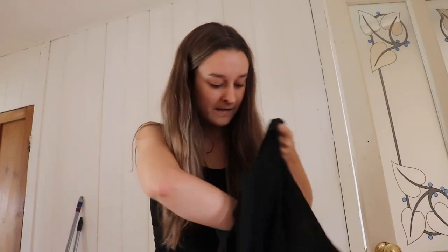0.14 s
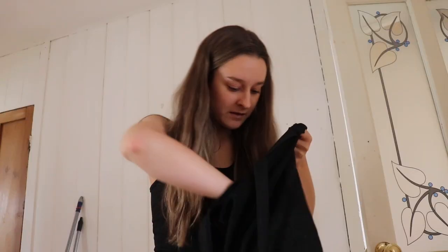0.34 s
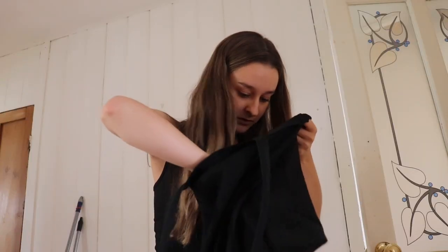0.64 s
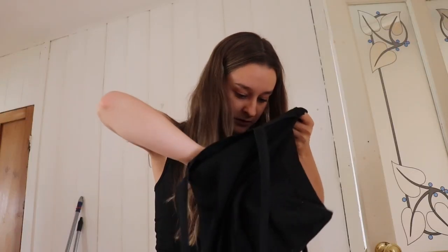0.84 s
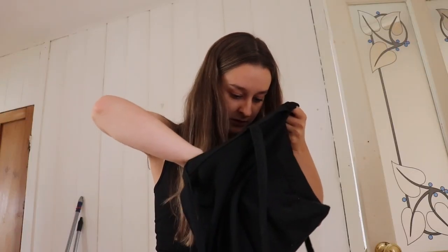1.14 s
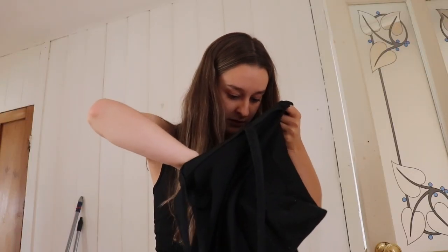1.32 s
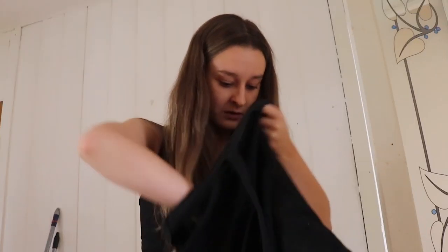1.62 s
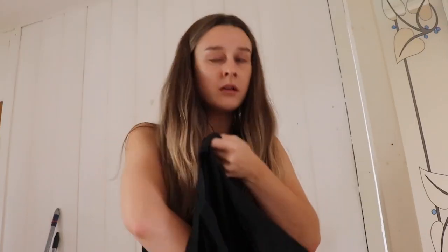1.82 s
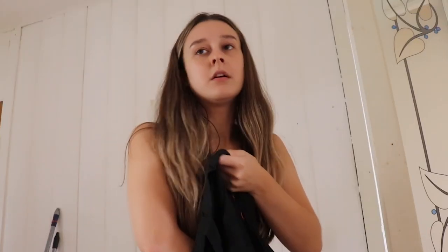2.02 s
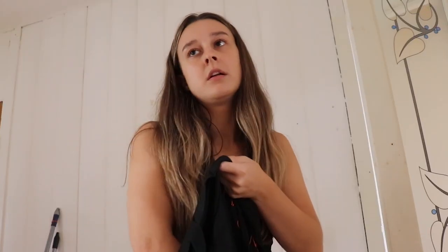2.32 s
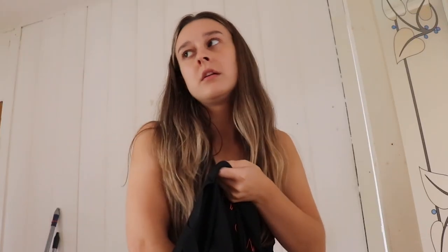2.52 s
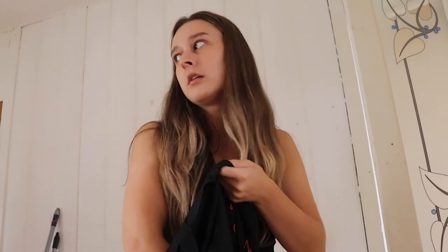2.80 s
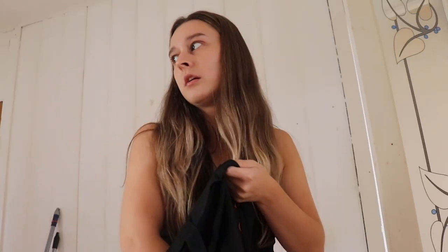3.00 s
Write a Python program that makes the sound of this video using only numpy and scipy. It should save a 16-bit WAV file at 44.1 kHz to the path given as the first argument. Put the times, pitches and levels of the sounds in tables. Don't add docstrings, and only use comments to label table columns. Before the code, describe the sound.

A hand rummages through a cloth bag, small hard items knocking, with a short pause midway

```python
import sys
import numpy as np
from scipy import signal
from scipy.fft import rfft, irfft, next_fast_len
from scipy.io import wavfile
from scipy.ndimage import uniform_filter1d

SR = 44100
rng = np.random.default_rng(int(sys.argv[2]) if len(sys.argv) > 2 else 0)


def volts_from_decibels(level):
    exponent = np.asarray(level, float) / 20
    return 10 ** exponent


def to_wav(sig):
    pcm = np.clip(np.atleast_2d(sig), -1, 1) * 32767
    pcm = np.round(pcm).astype(np.int16)
    wavfile.write(sys.argv[1], SR, pcm.T)


N = 138915

# start in seconds, length in seconds, effort in dB,
# brightness in dB per octave, share of the stroke spent rising.
STROKES = [(0, 0.2, -42, 1, 0.033), (0.059, 0.28, -30, 2, 0.21), (0.126, 0.21, -24, 0.5, 0.46),
           (0.255, 0.27, -28.5, 1.5, 0.37), (0.414, 0.029, -32, 8.5, 0.044),
           (0.441, 0.12, -30.5, 1.5, 0.098), (0.532, 0.3, -42, 4, 0.15), (0.798, 0.078, -51.5, 7, 0.63),
           (0.9, 0.057, -55.5, 4, .1), (0.892, 0.13, -56, -1.5, 0.51), (1.559, 0.1, -45.5, 3.5, 0.21),
           (1.602, 0.066, -38, 2.5, .1), (1.654, 0.17, -34, 2.5, 0.028), (1.748, 0.18, -47, 2.5, 0.36),
           (1.855, 0.084, -40, 1.5, 0.33), (1.9, 0.2, -34, 0, 0.036), (1.965, 0.36, -32, 1, 0.31),
           (2.155, 0.21, -30.5, 0, 0.79), (2.31, 0.23, -32.5, 2, 0.23), (2.473, 0.24, -27.5, 0.5, 0.043),
           (2.594, 0.087, -28.5, 0.5, 0.41), (2.711, 0.17, -37.5, 2, 0.26), (2.823, 0.094, -30.5, -1, 0.14),
           (2.896, 0.2, -40, 1, 0.19), (3.009, 0.24, -36.5, 0.5, 0.39)]
# frequency in Hz, level in dB per Hz.
CLOTH_COLOUR = [(59, -49), (100, -8.5), (784, -5), (950, -2), (1250, -3.5), (1650, -4.5), (4380, -6.5),
                (14100, -24.5), (16000, -26)]
# frequency in Hz, level in dB.
CLOTH_WIDTH = [(500, -26), (1500, -6), (12000, -1)]
# start in seconds, peak in dB, pitch in Hz, send to the walls in dB.
KNOCKS = [(.0813, -17, 3900, -3), (.1375, -15, 1900, -4), (.1605, -17, 1500, -2), (.1747, -10, 1900, -5),
          (.186, -15, 1600, -2), (.1915, -14, 1800, -3), (.2, -7, 2700, -3), (.212, -15, 4200, -2),
          (.225, -13, 2500, -3), (.2394, -11, 1600, -3), (.299, -16, 2800, -3), (.3185, -17, 2800, -3),
          (.3615, -15, 1800, -2), (.4104, -11, 3500, -3), (.4155, -13, 3900, -3), (.4218, -10, 2600, -3),
          (.4535, -11, 3800, -3), (.4615, -12, 4400, -3), (.4685, -13, 1000, 1), (.487, -18, 3900, -3),
          (.529, -21, 4300, -3), (1.5703, -24, 3000, -5), (1.6072, -18, 1400, -3), (1.6125, -22, 1000, -3),
          (1.6364, -15, 2700, -7), (1.6675, -7, 2400, -10), (1.6736, -16, 2100, -5),
          (1.6966, -19, 2600, -3), (1.707, -19, 1800, -3), (1.9042, -17, 1700, -5), (1.92, -22, 2400, -2),
          (1.991, -23, 1700, -3), (1.9978, -17, 1400, -3), (2.0238, -17, 4000, -4), (2.1598, -20, 4000, -4),
          (2.2291, -19, 3200, -5), (2.2803, -17, 3500, -4), (2.3085, -1.5, 3200, -11),
          (2.3155, -15, 2000, 0), (2.339, -14, 2100, -1), (2.3455, -14, 3800, -3), (2.4774, -8, 3000, -4),
          (2.4866, -12, 2200, -3), (2.5503, -12, 2100, -2), (2.6112, -13.5, 2300, -3),
          (2.6332, -13, 2000, -2), (2.642, -16, 2000, -2), (2.8415, -11, 3400, -4), (2.948, -23, 1900, -2),
          (3.0889, -25, 1800, -1)]
# start in seconds, length in seconds, level in dB, pitch in Hz.
SLIDES = [(0.461, 0.39, -39, 1050), (0.194, 0.088, -34, 980), (0.464, 0.17, -27, 4300),
          (.87, 0.18, -50, 530), (.95, 0.086, -48, 3720), (1.69, 0.18, -38, 1650), (2.027, .06, -35, 1050),
          (2.313, 0.068, -25, 2220), (2.482, 0.1, -21, 2270), (2.621, 0.085, -26.5, 5370),
          (2.628, 0.16, -28, 1150), (2.758, 0.13, -36, 1150), (2.849, 0.095, -26, 1880),
          (3.087, 0.057, -32, 875)]
# start in seconds, peak in dB, pitch in Hz.
TICKS = [(.628, -27, 3500), (.6839, -20, 8300), (.8258, -38, 7000), (.8408, -32, 8400), (.8583, -32, 7900),
         (.9123, -25, 8200), (.9387, -30.5, 7400), (.9435, -34, 3000), (.9514, -30, 3500),
         (1.4974, -30.5, 6500), (1.533, -33.5, 8500), (1.5775, -31, 3200), (1.698, -22, 8000),
         (1.8314, -30, 2600), (1.8708, -28, 8000), (1.9985, -20, 3200), (2.0595, -24, 4800),
         (2.107, -24, 7000), (2.12, -22, 5500), (2.1705, -25, 4000), (2.2181, -19.5, 6000),
         (2.3724, -15.5, 6000), (2.401, -18, 7500), (2.6173, -10, 5000), (2.7635, -21, 5600),
         (2.8283, -21.5, 1500), (2.8483, -16, 2300), (2.859, -19, 1900), (2.97, -30, 6000),
         (3.0395, -28, 2800), (3.1332, -21.5, 6300), (3.143, -21.5, 1600), (2.479, -14, 4200),
         (2.8425, -17, 6400)]
# start in seconds, peak in dB, pitch in Hz,
# time to ring down 60 dB in seconds.
BUMPS = [
    (0.43, -25.5, 255, 0.049),
    (0.468, -26, 333, 0.04),
    (0.688, -31.5, 350, 0.054),
    (0.728, -38, 366, 0.041),
    (1.605, -33.5, 432, 0.03),
    (1.665, -30, 495, 0.024),
    (1.904, -34, 443, 0.028),
    (1.994, -28, 690, 0.03),
    (2.078, -35.5, 583, 0.046),
    (2.285, -37, 345, 0.035),
]
NEAR_ECHOES = (.0007, .0011, .0019, .0024, .0033, .0046)
# frequency in Hz, time to fall 60 dB in seconds.
WALLS_T60 = [(200, 0.88), (600, 0.55), (1750, 0.5), (4500, 0.47), (9000, 0.46), (15000, 0.18)]
# frequency in Hz, gain in dB.
WALLS_COLOUR = [(200, -15.5), (600, -3), (1200, -6), (1800, 4), (2600, -3), (5000, -2), (12000, 0.5)]
# frequency in Hz, likeness from 0 to 1.
WALLS_SAME = [(100, 1), (300, 1), (700, 0.63), (1500, 0.034), (5000, 0.011)]
# frequency in Hz, level in dB per Hz.
HISS_COLOUR = [(15, -51), (25, -16.5), (80, 0), (236, -1.5), (317, -3.5), (1440, -11), (1650, -10),
               (6050, -15), (16000, -29)]
# frequency in Hz, likeness from 0 to 1.
HISS_SAME = [(60, 0.31), (250, 0.42), (600, 0.033)]
# frequency in Hz, gain in dB.
MIC = [(120, -23), (260, -6.5), (400, -1)]
# frequency in Hz, left minus right in dB.
PORTS = [(60, 1.5), (180, -0.5), (550, 1.5), (1650, 0.0), (4970, -0.5), (15000, -3.5)]
# frequency in Hz, gain in dB.
BAND_EDGE = [(15600, -0.5), (15950, -37), (16100, -36)]

FADE_DB = -33


def evened(x):
    return x / np.sqrt(np.mean(x ** 2) + 1e-20)


def peaked(x, db):
    return volts_from_decibels(db) * x / abs(x).max()


def read(points, hz):
    f, value = np.transpose(points)
    return np.interp(np.log(hz + 1), np.log(f + 1), value)


def coloured(x, points, scale=1):
    size = next_fast_len(x.shape[-1] + 4096)
    gain = volts_from_decibels(scale * read(points, np.fft.rfftfreq(size, 1 / SR)))
    return irfft(rfft(x, size) * gain, size)[..., :N]


def drift(seconds):
    size = max(int(seconds * SR), 2)
    once = uniform_filter1d(rng.standard_normal(N), size)
    return evened(uniform_filter1d(once, size))


def add(mix, s, sound):
    part = mix[round(s * SR):][:len(sound)]
    part += sound[:len(part)]


def ring(hz, t60, t, phase=0):
    return volts_from_decibels(-60 * t / t60) * np.sin(2 * np.pi * hz * t + phase)


def likened(a, b, same):
    return np.array([a, same * a + np.sqrt(1 - same ** 2) * b])


def crackles():
    snaps_per_s, spread_db, strongest = 1800, 4, 3.2
    chance = snaps_per_s / SR * volts_from_decibels(5.5 * drift(0.015))
    strength = volts_from_decibels(spread_db * np.minimum(rng.exponential(1, N), strongest))
    snaps = strength * (rng.random(N) < chance)
    kind = rng.integers(0, 24, N)
    fade = volts_from_decibels(-60 * np.arange(160) / SR / 0.0069)
    shapes = uniform_filter1d(rng.standard_normal((24, 160)), size=2) * fade
    out = np.zeros(N)
    for k, shape in enumerate(shapes):
        out += signal.oaconvolve(snaps * (kind == k), shape)[:N]
    return evened(out)


def cloth():
    crackle_db, rub_db, tilt_hz = -5, -6.5, 2810
    crackle = crackles()
    rub = rng.standard_normal(N) * volts_from_decibels(0.24 * drift(0.024) + 3.9 * drift(0.0024))
    both = evened(coloured(volts_from_decibels(crackle_db) * crackle + volts_from_decibels(rub_db) * evened(rub), CLOTH_COLOUR))
    out = np.zeros(N)
    for s, length, db, tilt_db, rising in STROKES:
        part = both[round(s * SR):][:int(length * SR)]
        u = np.arange(len(part)) / SR / length
        top = np.clip(rising, 0.02, 0.9)
        rise = np.sin(np.pi / 2 * u / top) ** 2
        fall = volts_from_decibels(FADE_DB * ((u - top) / (1 - top)) ** 2)
        tilt = [(tilt_hz / 8, -3 * tilt_db), (tilt_hz * 8, 3 * tilt_db)]
        bright = coloured(part, tilt)[:len(part)]
        add(out, s, volts_from_decibels(db) * np.where(u < top, rise, fall) * bright)
    return out


def knocks():
    hold_s, t60_s = 0.0014, 0.0045
    hollow_hz, hollow_db = 1850, -10
    ratios = (0.8, 1, 1.25, 1.55, 1.95, 2.5)
    near, far = np.zeros((2, N))
    t = np.arange(900) / SR
    after = np.maximum(t - hold_s, 0)
    chances = rng.random((len(KNOCKS), 13))
    noises = rng.standard_normal((len(KNOCKS), 900))
    for (s, db, hz, send_db), chance, noise in zip(KNOCKS, chances, noises):
        modes = 0
        for r, detune, phase in zip(ratios, chance[:6], chance[6:]):
            decay = volts_from_decibels(-11 * abs(np.log2(r)) - 60 * after * np.sqrt(r) / t60_s)
            pitch = hz * r * (0.8814 + 0.25 * detune)
            modes = modes + decay * np.sin(2 * np.pi * pitch * t + phase)
        crack = volts_from_decibels(-24.5) * noise * volts_from_decibels(-60 * after / 0.0074)
        onset = np.minimum(t / 0.00018, 1)
        hit = peaked((peaked(modes, 0) + crack) * onset, db)
        hollow = volts_from_decibels(db + hollow_db) * ring(hollow_hz * (0.87 + 0.11 * chance[-1]), 0.0051, t)
        add(near, s, hit)
        add(far, s, volts_from_decibels(send_db) * (hit + hollow))
    return near, far


def slides():
    out = np.zeros(N)
    for s, length, db, hz in SLIDES:
        u = np.arange(0, length, 1 / SR) / length
        band = signal.butter(1, [hz * 0.91, hz * 0.993], "band", fs=SR, output="sos")
        scrape = evened(signal.sosfilt(band, rng.standard_normal(SR)))[:len(u)]
        add(out, s, volts_from_decibels(db + FADE_DB * u) * np.minimum(u * 10, 1) * scrape)
    return out


def ticks():
    out, t = np.zeros(N), np.arange(400) / SR
    for s, db, hz in TICKS:
        grit = 0.35 * rng.standard_normal(400) * volts_from_decibels(-60 * t / 0.004)
        add(out, s, peaked(ring(hz, 0.0018, t) + grit, db))
    return out


def bumps():
    out, t = np.zeros(N), np.arange(6000) / SR
    for s, db, hz, t60 in BUMPS:
        upper = 0.6 * ring(hz * 1.35, 0.8 * t60, t)
        lower = 0.6 * ring(hz * 0.76, 1.5 * t60, t)
        thud = ring(hz, t60, t) + upper + lower
        add(out, s, peaked(thud * np.minimum(t / 0.0031, 1), db))
    return out


def nearby(x):
    taps = np.zeros((2, 400))
    taps[:, 0] = 1
    for k, s in enumerate(NEAR_ECHOES):
        taps[k % 2, round(s * SR)] = volts_from_decibels(-14) * (-1) ** (k // 2)
    return signal.oaconvolve(x[None], taps, axes=1)[:, :N]


def wall_tail():
    gap, spacing = 260, 20
    taps = np.zeros((2, SR))
    slots = np.arange(gap, SR - spacing, spacing)
    at = slots + rng.integers(0, spacing, (2, len(slots)))
    np.put_along_axis(taps, at, rng.choice([-1., 1.], at.shape), 1)
    hz, t, z = signal.stft(taps, SR, nperseg=256)
    same = np.clip(read(WALLS_SAME, hz), 0, 1)[:, None]
    decay = volts_from_decibels(-60 * t / read(WALLS_T60, hz)[:, None])
    tail = signal.istft(likened(z[0], z[1], same) * decay, SR, nperseg=256)[1]
    return tail / np.linalg.norm(tail[0])


def walls(x):
    shift_s = 0.035
    out, turn = 0, np.arange(N) / SR / shift_s
    for k in range(3):
        share = np.cos(np.pi / 2 * np.minimum(abs((turn - k) % 3 - 1), 1))
        out = out + signal.fftconvolve((x * share)[None], wall_tail(), axes=1)
    return coloured(out, WALLS_COLOUR)


def hiss():
    a, b = rfft(rng.standard_normal((2, N)))
    same = np.clip(read(HISS_SAME, np.fft.rfftfreq(N, 1 / SR)), 0, 1)
    pair = irfft(likened(a, b, same), N)
    return volts_from_decibels(-62 + 8.5) * evened(coloured(pair, HISS_COLOUR))


def scene():
    knock, far_knock = knocks()
    rubbing = volts_from_decibels(-0.5) * cloth() + slides()
    bump, tick = bumps(), ticks()
    to_walls = rubbing + volts_from_decibels(1.5) * bump + volts_from_decibels(-0.5) * tick + volts_from_decibels(5) * far_knock
    close = nearby(rubbing + bump + tick + knock)
    wide = coloured(rubbing * drift(0.002), CLOTH_WIDTH) * [[1], [-1]]
    return volts_from_decibels(0.57) * coloured(close + wide + walls(to_walls), MIC) + hiss()


def band_limit(x):
    return signal.sosfilt(signal.butter(12, 16510, fs=SR, output="sos"), x)


def record(dry):
    left = coloured(dry[0], PORTS, 0.5)
    right = coloured(dry[1], PORTS, -0.5)
    return band_limit(coloured(np.array([left, right]), BAND_EDGE))


dry = scene()
out = record(dry)
to_wav(out)
```